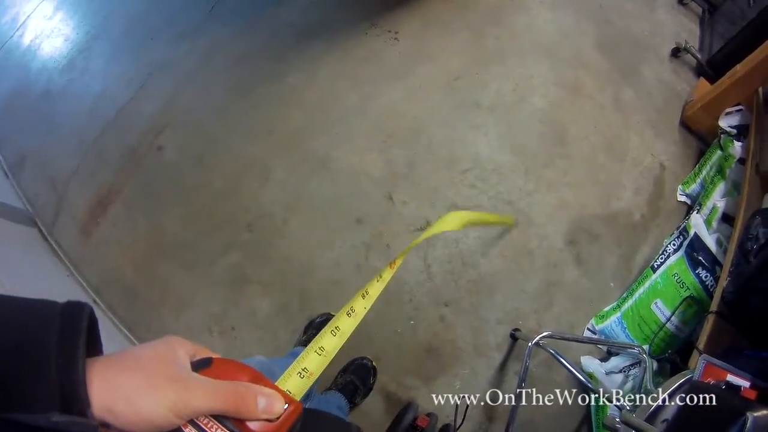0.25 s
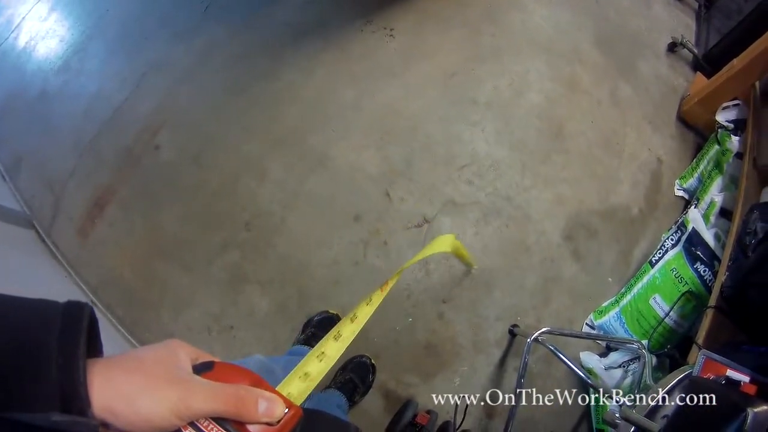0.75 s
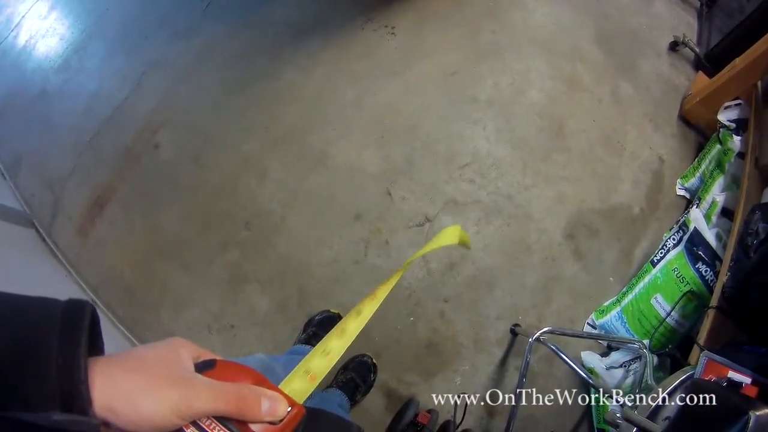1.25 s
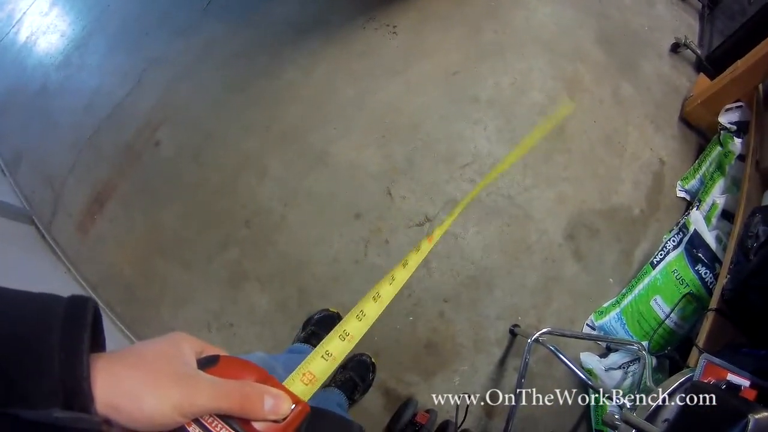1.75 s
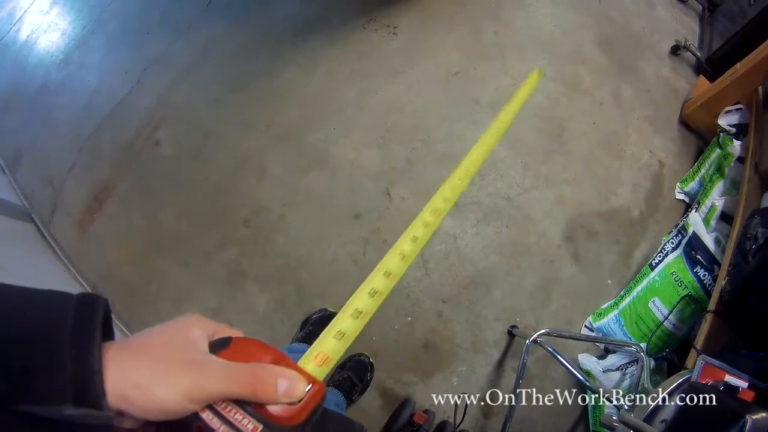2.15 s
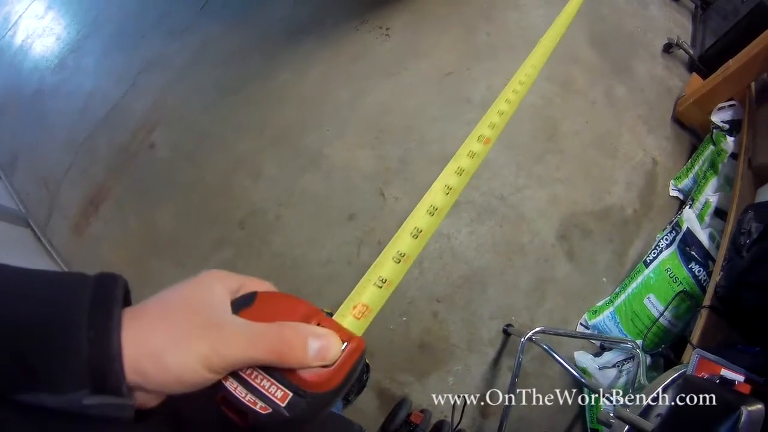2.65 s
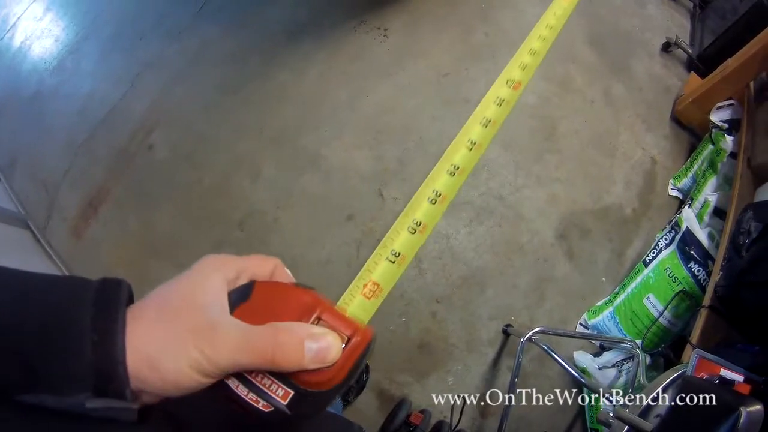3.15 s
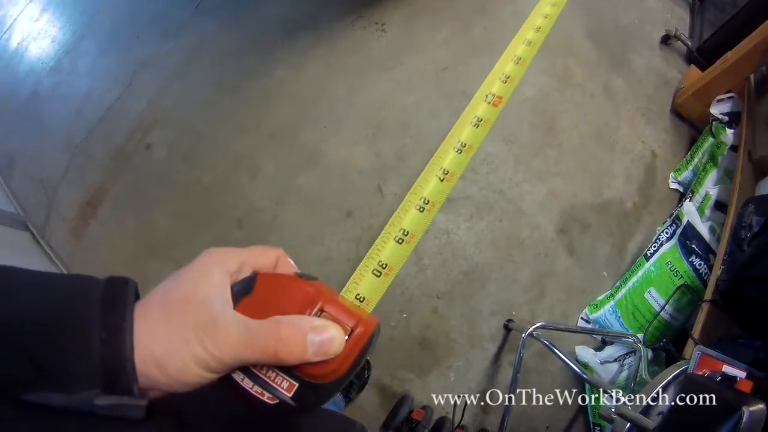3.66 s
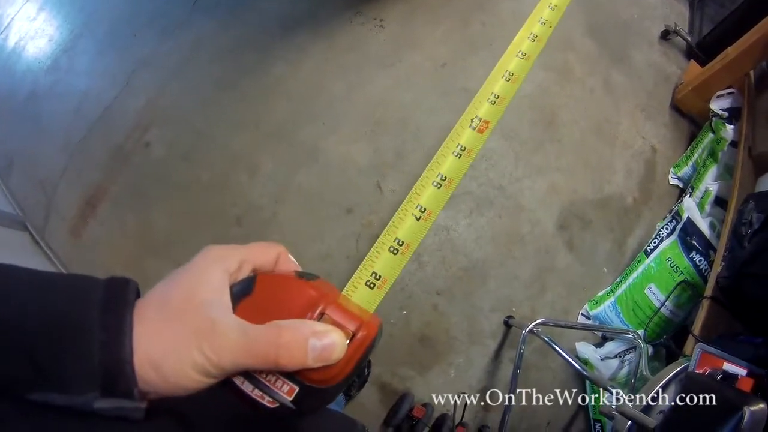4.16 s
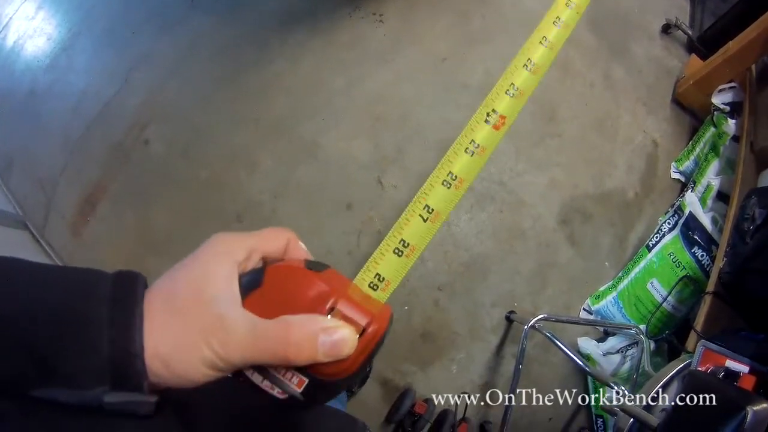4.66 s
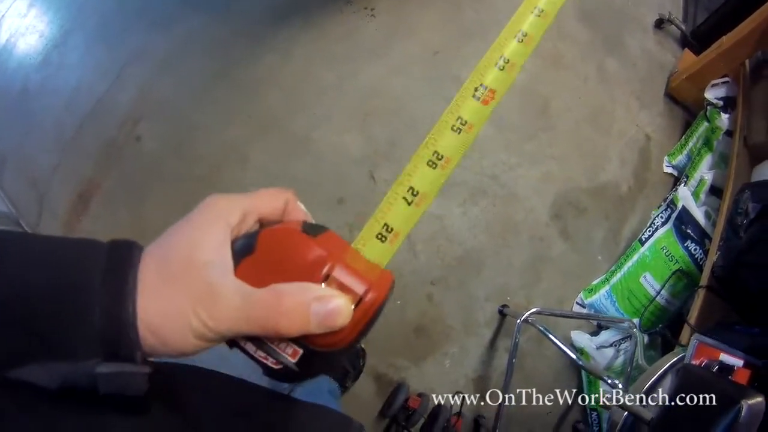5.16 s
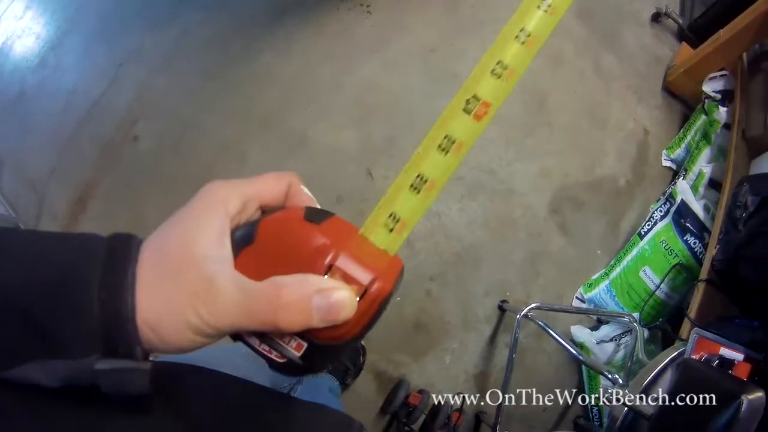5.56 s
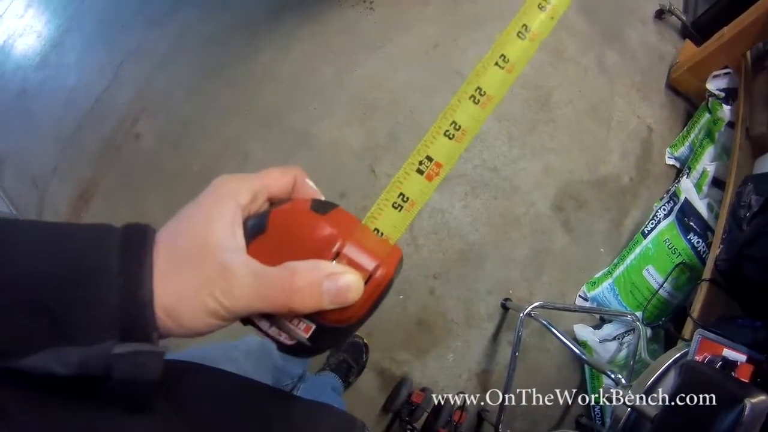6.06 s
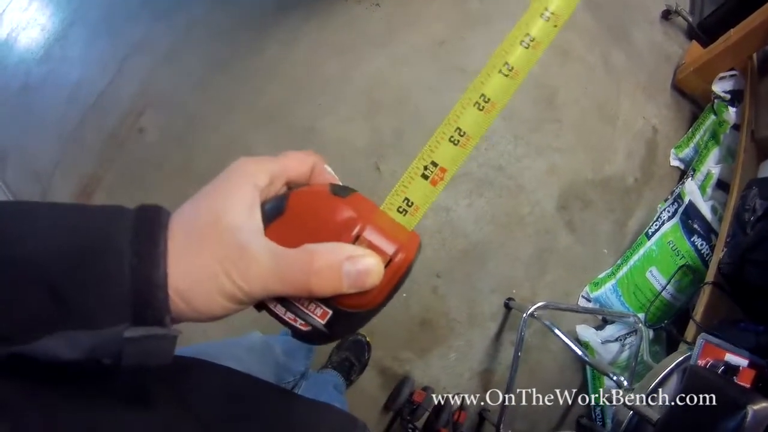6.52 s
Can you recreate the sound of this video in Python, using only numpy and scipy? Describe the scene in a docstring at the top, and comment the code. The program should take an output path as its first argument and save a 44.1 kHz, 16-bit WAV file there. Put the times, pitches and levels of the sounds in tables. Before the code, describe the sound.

A steel tape measure scrapes on concrete, glides back into its case in spurts, then its end clatters in a rapid, thin metallic rattle.

```python
"""A burst of steel scraping on concrete, then further spurts: a tape measure winds back into its case.
The blade is grit noise through resonances; it rushes through the case mouth as rub and hiss noise.
Hook clacks, some twenty a second later on, and flat slaps are short noise bursts at tabled times.
Spool rumble, handling rumble, room tone and a faint whine lie below; a garage answers briefly. Mono."""
import sys
import numpy as np
from scipy import signal
from scipy.fft import rfft, irfft, next_fast_len
from scipy.io import wavfile
from scipy.ndimage import map_coordinates

SR = 44100
rng = np.random.default_rng(int(sys.argv[2]) if len(sys.argv) > 2 else 0)


def unload_audio(sound):
    """Save the sound as a 16-bit wav file, at the path given as the first command line argument."""
    columns = np.transpose(np.atleast_2d(sound))
    # keep every value between -1 and 1, then stretch to whole-number steps
    steps = np.round(np.clip(columns, -1, 1) * 32767)
    wavfile.write(sys.argv[1], SR, steps.astype(np.int16))


N = 299439

# Levels in the tables are nominal, before the trims in the functions.
# spurts dragging the blade: full level at t/s, hold/s, level/dB, rise/(s per 20 dB), fade/(s per 20 dB)
PULLS = [(0.0, 0.0042, -24, .02, 0.1746), (1.955, 0.0454, -40.5, 0.0824, 0.0774),
         (2.102, 0.0087, -43, 0.0647, 0.0954), (2.171, 0.0312, -29.5, 0.0574, 0.1512),
         (2.526, 0.0177, -62, 0.69, 0.19), (3.439, 0.047, -56, 0.0709, .14),
         (4.039, 0.035, -58, 0.1777, 0.0659), (4.515, 0.537, -59.5, .1, 0.09),
         (5.243, 0.334, -46.5, 0.0536, 0.1827), (5.764, 0.0542, -43.5, 0.1123, 0.0589),
         (5.96, 0.0212, -58.5, 0.04, 0.21), (6.257, 0.0186, -43, 0.0756, 0.2661),
         (6.421, .02, -49.5, 0.2, 0.45), (6.78, .02, -49.5, 0.2635, -0.93)]
# scrape colours, in order of time: f/Hz, level/dB
FIRST_COLOUR = [(410, -57.5), (700, -25.5), (863, -20.5), (1120, -15.5), (1680, -10.5), (2000, -6),
                (2160, -7.5), (4490, -0.5), (5690, -3), (6150, -5), (10500, -7), (14600, -17.5),
                (16000, -25)]
SECOND_COLOUR = [(400, -44.5), (700, -18), (1000, -27.5), (1550, -11.5), (2400, -11), (3300, -6.5),
                 (4200, -5), (6800, -5.5), (9100, -9.5), (11000, -10), (14000, -16), (16000, -30)]
SLOW_COLOUR = [(410, -40.5), (700, -7.5), (1280, -14.5), (1480, -10), (1710, -8.5), (2220, -4),
               (2770, -7.5), (3600, -4.5), (6070, -3), (10400, -11), (16000, -25)]
# resonances of the blade skidding on the floor: f/Hz, width/Hz, relative level/dB
SKID_MODES = [(2480, 140, -1), (3050, 75, -13), (4350, 79, -6.5), (5240, 39, -9.5), (6370, 36, -1.5),
              (6690, 52, 3), (7150, 30, -6), (8450, 38, 8)]
# resonances of the curved blade as it shortens: f/Hz, width/Hz, relative level/dB
LONG_BLADE = [(4330, 32, 0.5), (4830, 230, -1), (4930, 24, 0.5), (6290, 47, -3), (8500, 50, 3),
              (10100, 68, -4.5), (11620, 88, -10), (12300, 78, -10), (12700, 35, -10)]
MIDDLE_BLADE = [(1903, 200, -7), (3410, 300, 4), (4010, 220, -3.5), (4530, 260, -7), (5200, 450, 4.5),
                (8480, 600, -3), (8830, 250, -5.5), (10420, 500, -15)]
SHORT_BLADE = [(2433, 343, -15), (3267, 36, -14), (3540, 38, 3.5), (4090, 107, 11.5), (4935, 130, 0.5),
               (5840, 347, -5.5), (6994, 87, -9.5), (7888, 140, 7), (9020, 35, -6), (10420, 190, -4),
               (11376, 240, -15.5), (12102, 49, -9.5)]
# hops of hook and blade: t/s, level/dB, treble against middle/dB, rebound against landing/dB
CLACKS = [(0.271, -52, -4, 1), (0.357, -58, -18, -5), (1.952, -37.0, 0, -14.5), (2.097, -44.5, 2, 2.5),
          (2.205, -28.5, 4, -14), (2.308, -38.0, -8, -15), (2.497, -57.5, -5.5, 3.5), (2.538, -59.5, 2, 4),
          (2.632, -62, -3, -8.5), (2.741, -61.5, -4, -5), (3.603, -54.5, -18, -14), (3.858, -60, -5, -13.5),
          (4.145, -58, -8.5, -7), (4.232, -61.5, -9.5, -16), (4.339, -58.5, -9.5, -14),
          (4.406, -48, -7.5, -16), (4.445, -40, -1.5, -10.5), (4.506, -39.5, -6, 1.5),
          (4.544, -36.0, -7, -15), (4.581, -40, -6.5, 3), (4.632, -36.5, -9, -2.5),
          (4.683, -43.5, -16.5, -16), (4.717, -47.5, -8.5, -15.5), (4.75, -33.5, -1, -14),
          (4.796, -38.5, -1.5, 1), (4.838, -35.5, -7, 0.5), (4.847, -44.0, -1.5, -6.5),
          (4.868, -41.5, -7.5, -13), (4.891, -34.5, -8.5, -9), (4.927, -37, -2, 3.5), (4.972, -42, -7.5, 4),
          (5.033, -45.5, -10, -14), (5.073, -41.0, -2.5, -13.5), (5.121, -46.0, -3, -6),
          (5.166, -38.0, -1.5, -14.5), (5.21, -26.5, -2, -15), (5.244, -30.5, -5.5, 2.5),
          (5.258, -24, 3, -14.5), (5.267, -32, 3, -3.5), (5.285, -28.0, 0, 0.5), (5.296, -26.5, -5, -16.5),
          (5.327, -18, 0.5, -4), (5.378, -27.5, -8, -11), (5.436, -28.0, 3, -10.5),
          (5.454, -39.5, -0.5, -13.5), (5.506, -36.5, -6, -1), (5.547, -31, -3.5, -8),
          (5.594, -40, -9, -17.5), (5.623, -35, -1, 0), (5.677, -39.5, -6.5, -13),
          (5.761, -37.0, -3, -13.5), (5.802, -35, -7.5, -16), (5.923, -50.5, 0.5, -15.5),
          (6.053, -54.5, 4.5, -5), (6.139, -39, -3, -13.5), (6.2, -31, -2.5, -13),
          (6.234, -31.5, -0.5, -11.5), (6.25, -34, 3, -14.5), (6.273, -32.5, 0.5, -14),
          (6.295, -35, -4, -14), (6.309, -27.5, -1, 2), (6.316, -27.0, 2.5, -15.5), (6.372, -33.5, 0, -3.5),
          (6.415, -31.5, -0.5, -0.5), (6.436, -31, 11, -14.5), (6.5, -33.5, -1, -3.5),
          (6.545, -34, -2.5, -2), (6.59, -37.5, 1, 3.5), (6.646, -37.5, -5, -2.5), (6.675, -39, -0.5, -1),
          (6.723, -40, -4, -9.5), (6.761, -26.5, 4.5, -11)]
# clack and rattle colour: f/Hz, level/dB
CLACK_COLOUR = [(400, -38), (720, -18.5), (1000, -23), (1350, -20), (1650, -10), (2300, -6), (2960, -7),
                (4050, -2), (5760, -3.5), (7690, -4.5), (12000, -10), (16000, -23.5)]
# whipping blade slapping flat on the floor: t/s, level/dB
SLAPS = [(1.943, -40.5), (2.146, -34.5), (2.162, -25.5), (2.198, -36), (2.238, -36.5), (2.362, -46),
         (2.415, -56), (2.435, -54)]
# slap colour: f/Hz, level/dB
SLAP_COLOUR = [(1200, -28.5), (1900, -13.5), (2350, -1.5), (3050, 1), (3700, -8), (5000, -9.5),
               (9000, -16.5), (15000, -37)]
# blade gliding into the case: t/s, rub level/dB, hiss level/dB
GLIDE = [(0.755, -53, -56), (0.767, -45, -47), (0.779, -42, -47), (0.841, -51, -53), (0.923, -53, -52),
         (1.159, -46, -46), (1.249, -48, -48), (1.391, -43.5, -38.5), (1.609, -43, -39), (1.709, -46, -54),
         (1.753, -60.5, -66), (1.801, -56.5, -64.5), (1.84, -74.5, -80)]
# glide colours: f/Hz, level/dB
RUB_COLOUR = [(410, -41), (700, -21), (1040, -19), (1340, -9), (1480, -14), (1890, -5.5), (3300, -4.5),
              (4790, 1), (5450, -2.5), (7040, -2.5), (9000, -9), (11700, -34), (19800, -120)]
HISS_COLOUR = [(4000, -32.5), (7000, -8), (9500, -4.5), (10600, 0.5), (12400, -3), (13700, -17),
               (15800, -19.5)]
# spool colour: f/Hz, level/dB
SPOOL_COLOUR = [(50, -18), (130, 0.5), (260, 0), (600, -4), (1100, -11.5), (2500, -22.5)]
# hand shifting and jostling the microphone: t/s, level/dB, swell and fade/(s per 20 dB)
JOLTS = [(0.0, -36, 0.09), (.88, -60, 1), (1.58, -60.5, 0.98), (2.19, -53, .18), (4.45, -64, .5),
         (5.25, -64, 1.3), (6.76, -57, 1.41)]
# handling rumble colour: f/Hz, level/dB
HAND_COLOUR = [(10, -19.0), (25, -2), (50, -3), (90, -6), (200, -31.5), (800, -80.5)]
# room tone colour: f/Hz, level/dB
ROOM_TONE = [(12, -24.5), (25, -2), (70, -3.5), (130, -5), (300, -11.5), (600, -22.5), (1500, -24.5),
             (5500, -35.5), (13500, -42.5), (16000, -50.5)]
# decay of the garage: f/Hz, t60/s
GARAGE_T60 = [(300, 0.31), (2000, 0.4), (6000, 0.16), (14000, 0.22)]
FLAT_COLOUR = [(1000, 0)]  # f/Hz, level/dB

BEND = 1.175  # power of time by which spurt levels rise and fall
COAST_DB, COAST_FADE_S = -24, 0.3666  # creep after a spurt: level against it, s per 20 dB
FIRST_UNTIL_S, SECOND_UNTIL_S = 1.0, 3.1  # scrape colour changes as the blade shortens
SHORTER_AT_S = 5.19  # clacks change resonances
RATTLE_PER_S, RATTLE_T60_S = 60, .007
RATTLE_DB, RATTLE_SPREAD_DB = 7, 2.5  # gain over the slide, spread
RATTLE_TOP_DB = -47  # slide level above which ticks stop growing
REBOUND_S, REBOUND_SCATTER = .0047, .08  # flight before the second contact, log spread
LEAD_S, LEAD_DB = .0035, -19  # blade edge grazes before landing: lead, level against landing
SPOOL_DB, SPOOL_AT_DB, SPOOL_DB_PER_DB = -56.5, -39.5, 0.3016  # spool level at a blade level, growth
HAND_DB = -68  # steady handling rumble, before trim
WHINE_HZ, TOP_HZ = 13850, 15850  # mean whine pitch, top of the sound


def amp(db):
    """Decibels to gain."""
    return 10 ** (np.asarray(db) / 20)


def unit(x):
    """Scale to rms 1."""
    return x / np.sqrt(np.mean(np.abs(x) ** 2) + 1e-20)


def along(points, hz):
    """Interpolate (f/Hz, value) points on a log frequency axis."""
    f, v = np.transpose(points)
    return np.interp(np.log(hz + 1), np.log(f + 1), v)


def levels(rows):
    """A gain per sample for each dB column, -100 dB outside the rows."""
    s, *columns = np.transpose(rows)
    s = np.r_[s[0] - .012, s, s[-1] + .05]
    t = np.arange(N) / SR
    return [amp(np.interp(t, s, np.r_[-100, c, -100])) for c in columns]


def wobble(rate):
    """A smooth random curve, rate knots a second."""
    knots = rng.standard_normal(int(N * rate / SR) + 4)
    return map_coordinates(knots, [np.arange(N) * rate / SR])


def filtered(x, response):
    """x through a minimum-phase filter with the given gain over frequency."""
    m = 2 * next_fast_len(len(x) // 2 + 4096)
    gain = np.maximum(response(np.fft.rfftfreq(m, 1 / SR)), 1e-6)
    cepstrum = irfft(np.log(gain))
    # fold the cepstrum forward: causal
    cepstrum[1:m // 2] *= 2
    cepstrum[m // 2 + 1:] = 0
    return irfft(rfft(x, m) * np.exp(rfft(cepstrum)), m)[:len(x)]


def coloured(x, colour, modes=(), ring_db=0):
    """x at rms 1 with a broad colour, lifted at the resonances."""
    def response(f):
        peaks = sum(amp(db / 2) / (1 + (2 * (f - hz) / width) ** 2) for hz, width, db in modes)
        return amp(along(colour, f)) * (1 + amp(ring_db) * peaks)

    return unit(filtered(x, response))


def grit(rate, spread_db, smooth):
    """Tiny contacts of uneven size, rate a second, over a smooth share of rubbing."""
    struck = rng.random(N) < rate / SR
    size = amp(spread_db * np.clip(rng.standard_normal(N), -2, 2))
    grains = struck * rng.standard_normal(N) * size
    return unit(unit(grains) + smooth * rng.standard_normal(N))


def sliding():
    """Gain of the slide: each spurt rises, holds and fades, then the blade coasts to rest."""
    t, power = np.arange(N) / SR, np.zeros(N)
    for s, hold, db, rise, fade in PULLS:
        before = np.maximum(s - t, 0)
        after = np.maximum(t - s - hold, 0)
        coast_db = COAST_DB - 20 * after / COAST_FADE_S
        release_db = np.maximum(-20 * (after / fade) ** BEND, coast_db)
        level_db = db - 20 * (before / rise) ** BEND + release_db
        power += amp(np.maximum(level_db, -140)) ** 2
    return np.sqrt(power)


def scrape(slide):
    """Sand in the concrete plucks the sliding blade, which chatters as it goes."""
    t = np.arange(N) / SR
    first = coloured(grit(1800, 1.8, 0.98), FIRST_COLOUR, LONG_BLADE, ring_db=-7.5)
    second = amp(-1.5) * coloured(grit(1300, 1.6, 1.0), SECOND_COLOUR, SKID_MODES, ring_db=-0.5)
    slow = amp(-0.5) * coloured(grit(2500, 2.5, .9), SLOW_COLOUR, SHORT_BLADE, ring_db=-4.5)
    steel = np.select([t < FIRST_UNTIL_S, t < SECOND_UNTIL_S], [first, second], slow)
    return slide * steel * amp(1.4 * wobble(70))


def rattle(slide):
    """The sliding blade ticks against the floor at random."""
    size = amp(RATTLE_SPREAD_DB * np.clip(rng.standard_normal(N), -2, 2))
    ticks = (rng.random(N) < RATTLE_PER_S / SR) * size
    envelope = signal.lfilter([1], [1, -amp(-60 / (RATTLE_T60_S * SR))], ticks)
    strength = amp(RATTLE_DB) * np.minimum(slide, amp(RATTLE_TOP_DB))
    return strength * envelope * coloured(rng.standard_normal(N), CLACK_COLOUR)


def blow(rise_s, crack_t60_s, buzz_t60_s, buzz_db):
    """A short crash of thin steel, then a spiky buzz as it settles; rms 1 over the first 3 ms."""
    t = np.arange(SR // 8) / SR
    crash = (1 - np.exp(-t / rise_s)) * amp(-60 * t / crack_t60_s)
    buzz = amp(buzz_db - 60 * t / buzz_t60_s) * rng.exponential(size=len(t))
    x = (crash + buzz) * rng.standard_normal(len(t))
    return x / np.std(x[:round(.003 * SR)])


def contacts():
    """(t/s, level/dB, treble/dB) of every contact: each hop grazes the floor, lands and rebounds."""
    rows = []
    for s, db, treble_db, rebound_db in CLACKS:
        flight_s = REBOUND_S * np.exp(REBOUND_SCATTER * rng.standard_normal())
        rows.append((s - LEAD_S, db + LEAD_DB, treble_db))
        rows.append((s, db, treble_db))
        rows.append((s + flight_s, db + rebound_db, treble_db))
    return rows


def clack(treble_db, tilt=0.71, neutral_db=-4.0, ping_db=3.5, ping_hz=5000, ping_width_hz=800):
    """One contact: a blow tilted to its own brightness, with a bending mode at a random pitch."""
    length, spot = rng.standard_normal(2)
    x = blow(rise_s=0.00042, crack_t60_s=.0065 * np.exp(0.55 * length), buzz_t60_s=0.073, buzz_db=-24)
    mode_hz = ping_hz * np.exp(.3 * spot)  # each spot of the blade favours its own mode

    def response(f):
        ping = 1 + amp(ping_db) / (1 + (2 * (f - mode_hz) / ping_width_hz) ** 2)
        octaves = np.log2(np.clip(f, 4200, 11000) / 6000)
        bright = amp(tilt * (treble_db - neutral_db) * octaves)
        return ping * bright * amp(along(CLACK_COLOUR, f))

    return np.std(x) * unit(filtered(x, response))


def clacks():
    """The hook hops over the floor and shakes the blade, which rings in its resonances."""
    hits = np.zeros(N + SR)
    for s, db, treble_db in contacts():
        x = clack(treble_db)
        hits[round(s * SR):][:len(x)] += amp(db) * x
    early = hits[:N] * (np.arange(N) < SHORTER_AT_S * SR)
    late = hits[:N] - early
    middle = np.std(early) * coloured(early, FLAT_COLOUR, MIDDLE_BLADE, ring_db=-4)
    short = np.std(late) * coloured(late, FLAT_COLOUR, SHORT_BLADE, ring_db=-2)
    return middle + short


def slaps():
    """The blade lands flat: longer and lower than a clack."""
    hits = np.zeros(N + SR)
    for s, db in SLAPS:
        x = blow(rise_s=.0008, crack_t60_s=0.038, buzz_t60_s=0.11, buzz_db=-25)
        hits[round(s * SR):][:len(x)] += amp(db) * x
    return np.std(hits[:N]) * coloured(hits[:N], SLAP_COLOUR)


def glide():
    """The painted blade rubs the mouth of the case, with a high hiss at speed."""
    rub, hiss = levels(GLIDE)
    body = rub * coloured(grit(3500, 3, 1.2), RUB_COLOUR, LONG_BLADE, ring_db=-13) * amp(-1.28)
    fizz = hiss * coloured(rng.standard_normal(N), HISS_COLOUR) * amp(-1.12)
    return body * amp(0.85 * wobble(55)) + fizz * amp(1.1 * wobble(45))


def garage(x, wet_db, near, build_s=0.0022, count=18):
    """Hand, case and floor echo within 8 ms, then the walls answer; the echo pattern keeps shifting."""
    heard, place = np.zeros(N + SR), np.linspace(0, count - 1, N)
    for k in range(count):
        hz, t, z = signal.stft(rng.standard_normal(SR // 2), SR, nperseg=256)
        decay = amp(-60 * t / along(GARAGE_T60, hz)[:, None])
        tail = signal.istft(z * decay, SR, nperseg=256)[1]
        tail *= 1 - np.exp(-np.arange(len(tail)) / SR / build_s)
        answer = amp(wet_db) * tail / np.linalg.norm(tail)
        answer[0] = 1  # direct sound
        delays_s = rng.uniform(.0008, .008, size=6)
        answer[(SR * delays_s).astype(int)] += near * rng.choice([-1, 1], size=6)
        # crossfade from one answer to the next
        share = np.maximum(1 - np.abs(place - k), 0)
        active = np.flatnonzero(share)
        echo = signal.fftconvolve((x * share)[active], answer)
        heard[active[0]:][:len(echo)] += echo
    return heard[:N]


def activity(steel, lag_s=0.021):
    """How hard the blade is working: its smoothed level in dB against SPOOL_AT_DB."""
    keep = np.exp(-1 / (lag_s * SR))
    power = signal.lfilter([1 - keep], [1, -keep], steel ** 2)
    return 10 * np.log10(power + 1e-9) - SPOOL_AT_DB


def spool(effort_db):
    """The spring-driven spool rumbles softly in its plastic case, more as the blade works harder."""
    gain = amp(SPOOL_DB + SPOOL_DB_PER_DB * effort_db)
    return gain * coloured(grit(900, 2, 1.57), SPOOL_COLOUR)


def handling():
    """Low noise from the hand, swelling at each jolt."""
    t = np.arange(N) / SR
    jolts = sum(amp(db - 20 * np.abs(t - s) / fade) ** 2 for s, db, fade in JOLTS)
    hand = np.sqrt(amp(HAND_DB) ** 2 + jolts)
    return amp(-1.5) * hand * coloured(rng.standard_normal(N), HAND_COLOUR)


def whine():
    """A faint, thin electrical tone, slightly unsteady in pitch."""
    hz = WHINE_HZ + 10 * wobble(120)
    return amp(-85) * np.sin(2 * np.pi * np.cumsum(hz) / SR)


def room_tone():
    """Steady noise, mostly low."""
    return amp(-65) * coloured(rng.standard_normal(N), ROOM_TONE)


def scene():
    """Sliding and clacking steel in the garage over the background, the same in both channels."""
    slide = sliding()
    rubbing = scrape(slide) + rattle(slide) + glide()
    rubbed = amp(-.5) * garage(rubbing, wet_db=-8.0, near=0.23)
    struck = garage(clacks() + slaps(), wet_db=-3.0, near=0.214)
    steel = rubbed + struck
    mono = steel + spool(activity(steel)) + handling() + room_tone() + whine()
    return np.array([mono, mono])


def record(dry):
    """Low-pass: nothing sounds above TOP_HZ."""
    m = next_fast_len(N + SR // 2)
    passed = np.fft.rfftfreq(m, 1 / SR) < TOP_HZ
    return irfft(rfft(dry, m) * passed, m)[:, :N]


dry = scene()
out = record(dry)
unload_audio(out)
```